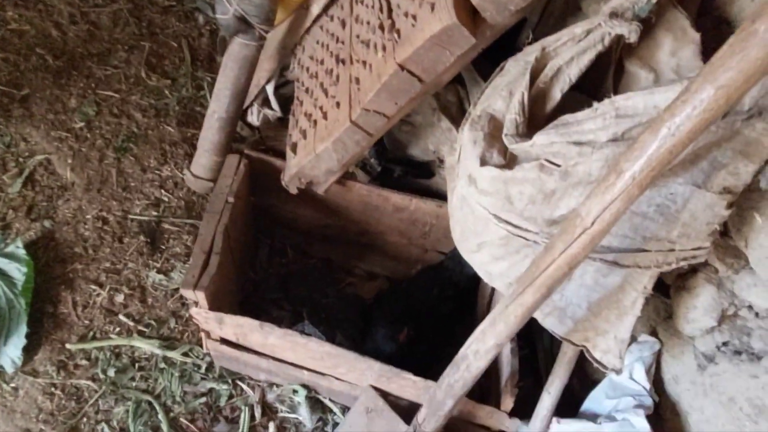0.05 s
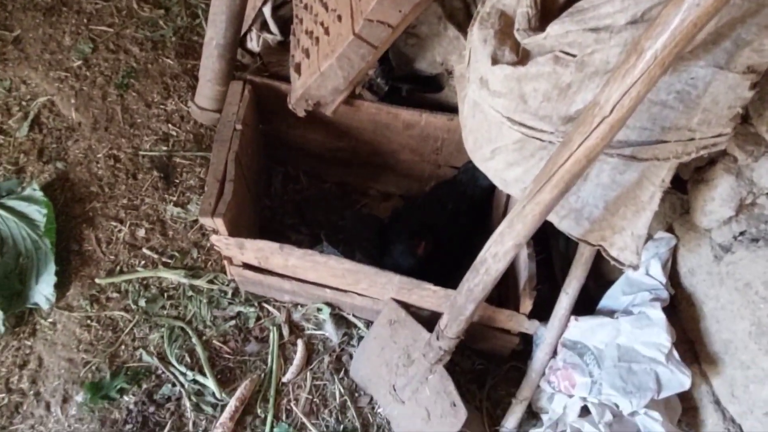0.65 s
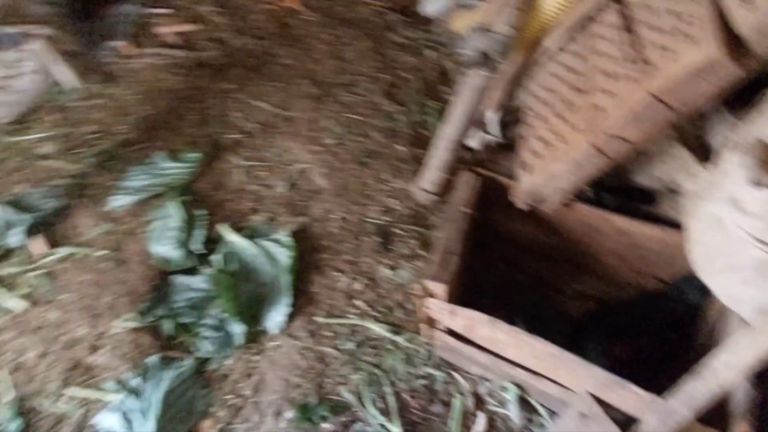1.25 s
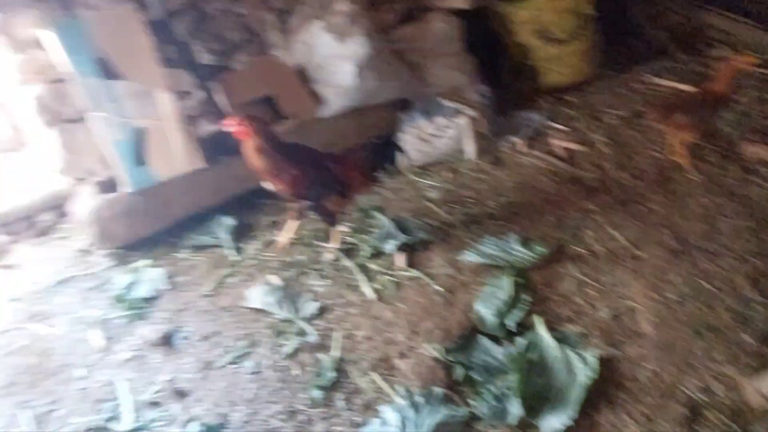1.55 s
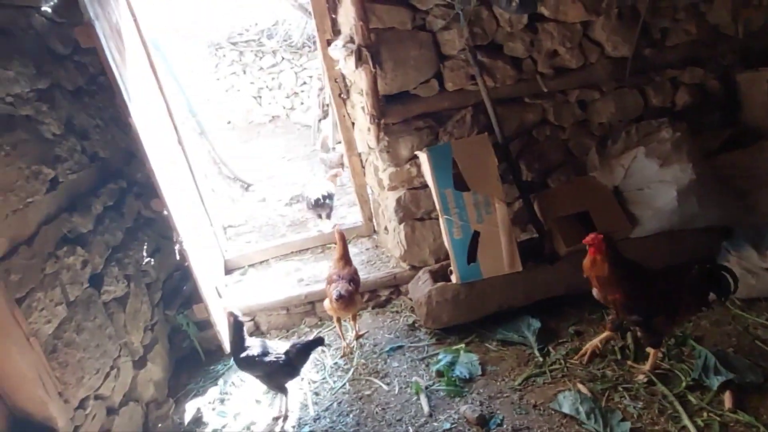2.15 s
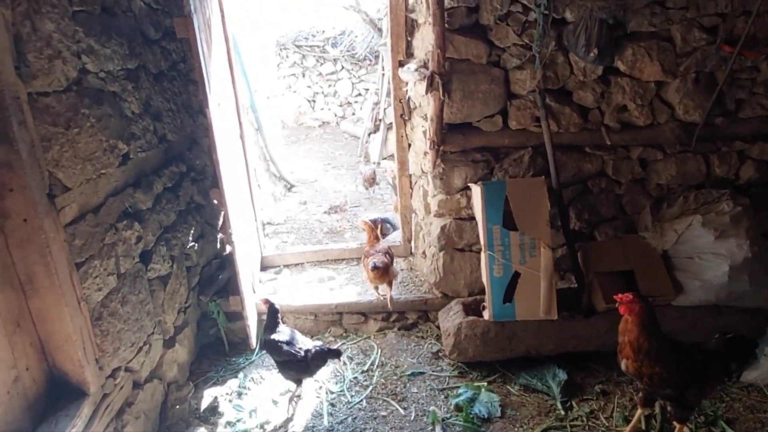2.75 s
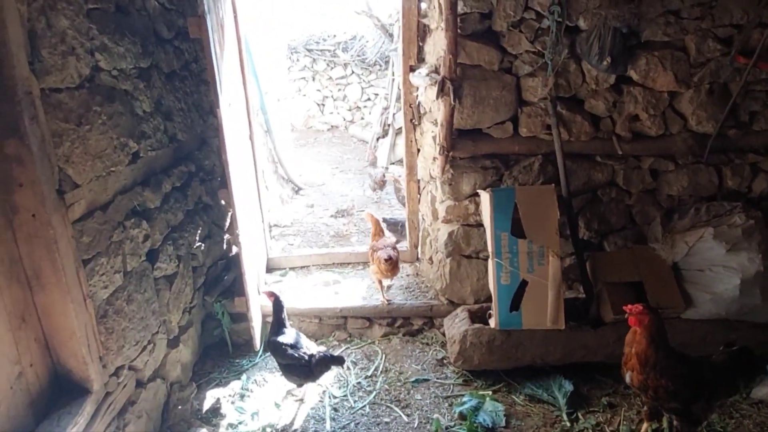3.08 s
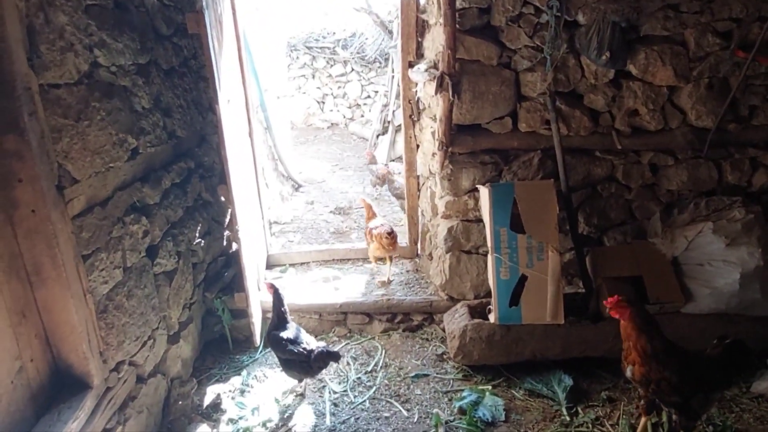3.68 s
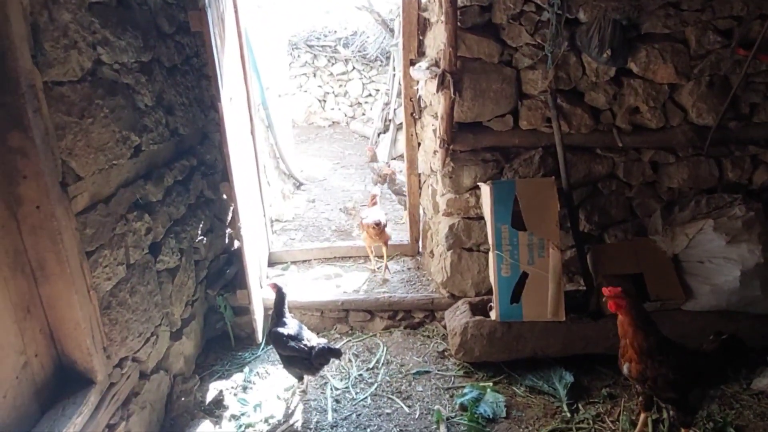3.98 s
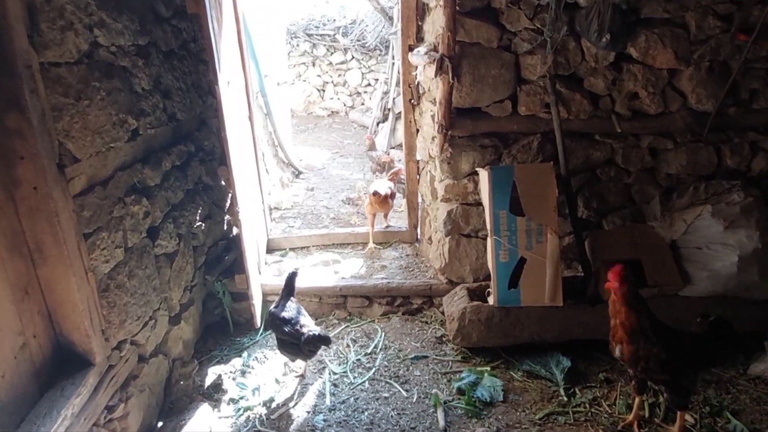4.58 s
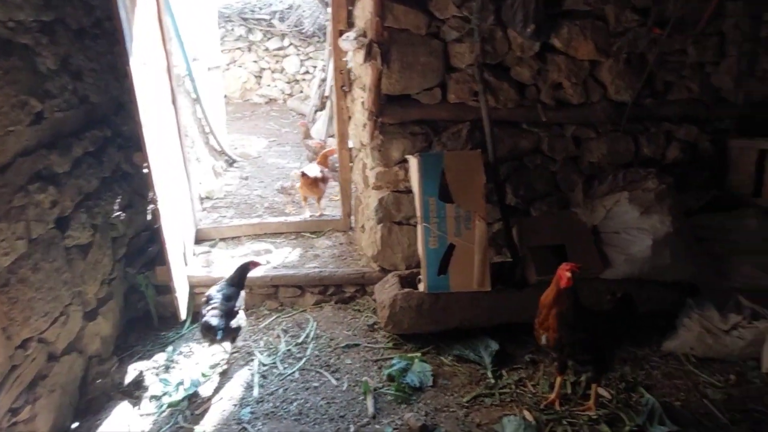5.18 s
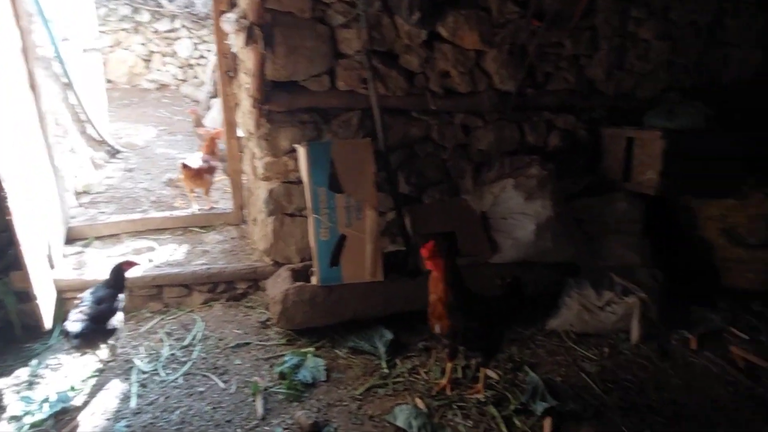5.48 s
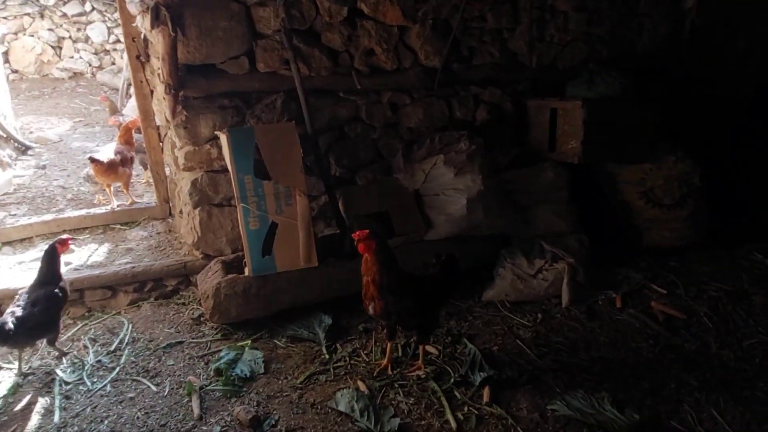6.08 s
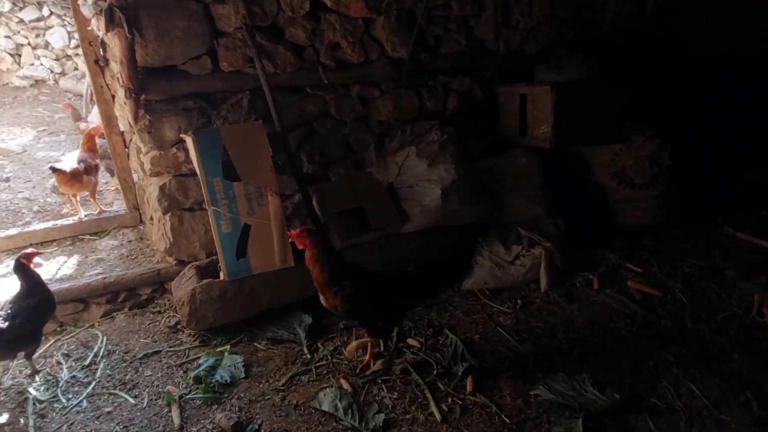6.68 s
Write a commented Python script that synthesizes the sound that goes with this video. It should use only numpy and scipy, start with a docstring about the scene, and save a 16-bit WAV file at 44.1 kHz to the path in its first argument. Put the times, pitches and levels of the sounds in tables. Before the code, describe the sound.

In a small stone coop, a hen clucks about three times a second, growing louder until she lets out a loud, hoarse squawk that opens with a whistle. She clucks again more softly, gives a second rough screech, and trails off. The close walls add a short echo. Straw rustles faintly, and a hand rubs and ticks on the microphone's case.

```python
"""Over faint, still air come a soft coo and a tick, and at once a hen starts clucking in a small stone
coop, about three times a second. Twice she breaks into a loud, hoarse squawk, the first with a whistle.
Her voice is a train of uneven pulses ringing in her throat; the harder she clucks, the higher it rings.
The close walls answer every call. Other hens coo, straw rustles, and later come two faint, breathy swells
of hiss. A hand rubs, ticks and bumps on a camera's case. The camera turns itself down after loud calls."""
import sys
import numpy as np
from scipy import signal
from scipy.fft import rfft, irfft, next_fast_len
from scipy.io import wavfile
from scipy.ndimage import uniform_filter1d, map_coordinates

SR = 44100
rng = np.random.default_rng(int(sys.argv[2]) if len(sys.argv) > 2 else 0)


def master(y):
    """Save y as 16-bit WAV."""
    cut = np.clip(np.atleast_2d(y).T, -1, 1)
    pcm = np.round(cut * 32767)  # scale
    wavfile.write(sys.argv[1], SR, pcm.astype(np.int16))


N = 305613


def amp(db):
    """Turn decibels (dB) into a number to multiply by."""
    return 10 ** (np.asarray(db) / 20)


def unit(x):
    """Scale x to an average strength (rms) of 1."""
    return x / np.sqrt(np.mean(x ** 2) + 1e-20)


def along(points, hz):
    """Read between rows of (Hz, value), spacing the octaves evenly."""
    freqs, values = np.transpose(points)
    return np.interp(np.log(hz + 1), np.log(freqs + 1), values)


def add(track, start_s, x):
    """Mix x into the track from start_s on."""
    start = max(round(start_s * SR), 0)
    x = x[..., :max(N - start, 0)]
    track[..., start:start + x.shape[-1]] += x


def panned(x, db):
    """Make the left louder than the right by db; a negative pan leans right."""
    return x * amp([[db / 2], [-db / 2]])


def wobble(n, rate):
    """A smooth curve through rate random values a second."""
    return map_coordinates(rng.standard_normal(2048), [np.arange(n) * rate / SR], mode="wrap")


def held(t, length, rise_s, fade_db_per_s):
    """A volume that rises, holds until length and then fades."""
    return np.clip(t / rise_s, 0, 1) * amp(-fade_db_per_s * np.maximum(t - length, 0))


def strokes(rows, rise_s, fade_db_per_s):
    """The combined volume of overlapping movements."""
    t = np.arange(N) / SR
    return np.sqrt(sum((amp(db) * held(t - start, length, rise_s, fade_db_per_s)) ** 2
                       for start, length, db in rows))


def filtered(x, response):
    """Scale each frequency in x by response(frequency)."""
    n = x.shape[-1]
    size = next_fast_len(n + 4096)
    return irfft(rfft(x, size) * response(np.fft.rfftfreq(size, 1 / SR)), size)[..., :n]


def resonance(f, hz, width):
    """How something that rings at hz responds to frequency f."""
    return 1j * f * width / (hz * hz - f * f + 1j * f * width)


def ring(x, points, size=2048):
    """Let x ring with the tone colour given by rows of (Hz, dB)."""
    cepstrum = irfft(np.log(amp(along(points, np.fft.rfftfreq(size, 1 / SR)))))
    # this fold puts the ringing after each pulse, never before
    cepstrum[1:size // 2] *= 2
    cepstrum[size // 2 + 1:] = 0
    return signal.fftconvolve(x, irfft(np.exp(rfft(cepstrum))))[:len(x)]


def rush(points, side_db, patchy_db):
    """Stereo noise coloured by rows of (Hz, dB), in shifting patches; side_db sets its width."""
    spectrum = signal.stft(rng.standard_normal((2, N)), nperseg=512)[2]
    patches = uniform_filter1d(rng.standard_normal(spectrum.shape[1:]), size=9, axis=0)
    patches = uniform_filter1d(patches, size=12, axis=1)
    noise = signal.istft(spectrum * amp(patchy_db * unit(patches)), nperseg=512)[1][:, :N]
    mid, side = filtered(noise, lambda f: amp(along(points, f)))
    return unit(np.array([mid + amp(side_db) * side, mid - amp(side_db) * side]))


# Echoes off the floor and walls. Each row: left delay in ms, right delay in ms, level in dB.
WALL_ECHOES = [(1.3, 1.519, -11), (2.9, 3.2, -11), (4.7, 4.85, -4), (6.1, 10, -13.5), (8.2, 8.3, -4.5),
               (10.6, 12, -9), (13.3, 16, -18), (17.4, 13, -9.5)]
# The coop's fading tail. Each row: frequency in Hz, seconds to fade by 60 dB.
TAIL_FADE = [(150, 0.2), (1000, 0.12), (3000, 0.13), (8000, 0.09), (15000, 0.07)]
# The tail's width. Each row: frequency in Hz, how much left and right differ (0 is not at all).
TAIL_WIDTH = [(200, .3), (1000, 1.1)]
def coop(x, walls_db, tail_db, left_lead_s=.00025, wander=0.):
    """A sound arrives on the left first, slaps off the near walls and leaves a short tail."""
    hz, t, noise = signal.stft(rng.standard_normal((2, SR // 3)), SR, nperseg=256)
    mid, side = noise[0], noise[1] * along(TAIL_WIDTH, hz)[:, None]
    fade = amp(-60 * t / along(TAIL_FADE, hz)[:, None])
    tail = signal.istft(np.array([mid + side, mid - side]) * fade, SR, nperseg=256)[1]
    answer = amp(tail_db) * tail / np.linalg.norm(tail[0])
    *delays_ms, slap_db = np.transpose(WALL_ECHOES)
    stretch = 1 + wander * rng.uniform(-1, 1, len(WALL_ECHOES))  # a moving head changes every path
    delays = (np.array(delays_ms) * stretch * SR / 1000).astype(int)
    for channel in range(2):
        answer[channel, delays[channel]] += amp(walls_db + slap_db)
        answer[channel, round(channel * left_lead_s * SR)] += 1
    echoed = signal.fftconvolve(x[None], answer, axes=1)
    return echoed * np.linalg.norm(x) / np.linalg.norm(echoed, axis=1, keepdims=True)  # same energy


# The colour of the background. Each row: frequency in Hz, level in dB.
AIR_COLOUR = [(25, -8), (45, 1), (65, 8.5), (110, -1), (250, -4), (500, -13), (1200, -15), (2500, -18),
              (7000, -20.5), (9000, -22.5), (14000, -23), (16000, -25.5)]
def still_air(level_db=-69.5):
    """The air of the coop: a faint, low rush that wavers slightly."""
    return amp(level_db + .5 * wobble(N, 11)) * rush(AIR_COLOUR, side_db=-1, patchy_db=1.5)


# Soft notes. Each row: middle in seconds, length in seconds, level in dB, first and last pitch in Hz.
COO_NOTES = [(0.023, 0.068, -59.5, 965, 714), (0.193, 0.053, -51.5, 386, 416), (4.978, 0.47, -84, 788, 780)]
def coos(quaver=.025):
    """Other hens sing quiet, sliding notes with one weak overtone."""
    out = np.zeros((2, N))
    for middle, length, db, first_hz, last_hz in COO_NOTES:
        n = int(length * SR)
        pitch = np.linspace(first_hz, last_hz, n) * (1 + quaver * wobble(n, 318))
        phase = 2 * np.pi * np.cumsum(pitch) / SR
        note = unit(np.hanning(n) * (np.sin(phase) + amp(-14.5) * np.sin(2 * phase)))
        add(out, middle - length / 2, coop(amp(db) * note, walls_db=-23, tail_db=-8))
    return out


# Small ticks. Each row: start in seconds, peak level in dB, ring in Hz, pan in dB.
CASE_TICKS = [(0.04, -41.5, 8000, -4.5), (0.9111, -26, 8600, -14), (2.4326, -31, 4960, 0),
              (2.4574, -42.5, 5020, -5), (2.8489, -17, 11980, -8.5), (4.1579, -47.5, 3200, -8),
              (5.1971, -41.5, 8950, -20.5)]
def ticks():
    """The case ticks: a sharp snap of noise with a short, weaker tail."""
    out, t = np.zeros((2, N)), np.arange(SR // 8) / SR
    fade = amp(-60 * t / .0017) + amp(-12.5 - 60 * t / .05)
    for start, db, hz, pan in CASE_TICKS:
        snap = rng.standard_normal((2, len(t))) * fade
        tick = filtered(snap, lambda f: resonance(f, hz, width=1.2 * hz))
        add(out, start, panned(amp(db) * tick / np.abs(tick).max(), pan))
    return out


def voice_box(pitch, jitter, scatter_db, rasp):
    """One pulse per cycle, uneven in time (jitter) and size (scatter), each with a puff of air (rasp)."""
    n = len(pitch)
    cycles = np.cumsum(pitch) / SR + .5
    late, size = rng.standard_normal((2, 256))
    at = np.searchsorted(cycles, np.arange(1, int(cycles[-1]) + 1)).clip(0, n - 1)
    at = (at + late[:len(at)] * (jitter * SR / pitch)[at]).astype(int).clip(0, n - 1)
    pulses = np.bincount(at, amp(scatter_db * size[:len(at)]), n)
    puff_volume = signal.lfilter([1], [1, -np.exp(-1 / (.0014 * SR))], pulses)
    puffs = puff_volume * rng.standard_normal(SR)[:n]
    share = np.clip(rasp, 0, 1)
    return np.sqrt(1 - share) * unit(pulses) + np.sqrt(share) * unit(puffs)


# The clucks. Each row: start in seconds, level in dB, length in seconds, then the chest and the
# bright edge in dB compared with the main ring.
HEN_CLUCKS = [(0.11, -42, .06, -16, -14), (0.218, -49, .04, 14.5, -14.5),
              (0.373, -37.5, .063, -16.5, -10.5), (0.67, -34.5, .058, -18, -10),
              (1.01, -33.5, 0.053, -17, -16.5), (1.271, -32, .055, -12, -12.5),
              (1.656, -28.5, .06, -16, -11), (1.957, -28.5, .06, -16, -15),
              (2.213, -29.5, 0.058, -12.5, -15), (2.543, -28.5, .058, -17, -15.5),
              (2.836, -24.5, .061, -21.5, -13), (3.153, -25.5, .065, -17, -15.5),
              (3.424, -22.5, .066, -17.5, -15.5), (4.421, -38, .058, -12, -14.5),
              (4.706, -43.5, .047, -16, -16), (5.056, -48.5, .052, -9, -14), (5.343, -35, .06, -9.5, -13.5),
              (5.632, -30.5, .075, -9.5, -6.5), (5.886, -30, 0.063, -14, -9),
              (6.421, -37.5, .072, 5.5, -10.5), (6.617, -43, 0.046, 1.5, -13),
              (6.785, -49, .045, 3.5, -11.5)]
# The throat's main ring. Each row: multiple of the throat frequency, level in dB.
MAIN_RING = [(.15, -52), (.45, -17.5), (.68, -15.5), (.87, -6.5), (1, 0.5), (1.15, -7), (1.36, -10),
             (1.6, -31), (1.95, -25.5), (4, -47), (16, -75)]
# The chest's low ring. Each row: frequency in Hz, level in dB.
CHEST_RING = [(100, -38), (170, -29.5), (230, -1), (310, 6), (420, -5), (560, 2), (800, -13), (2000, -50.5)]
# The bright edge of an easy cluck. Each row: frequency in Hz, level in dB.
EDGE_RING = [(150, -50), (1200, -24.5), (1650, -11), (2150, 4.5), (2600, -1.5), (3100, 1.5), (3400, 1.5),
             (3850, -3.5), (4700, -10.5), (5600, -24.5), (7100, -17.5), (8800, -31), (12500, -23.5),
             (16000, -24.5)]
def clucks(easy_db=-30, easy_pitch_hz=188.5, easy_throat_hz=893, fizz_hz=4500):
    """Each cluck swells until the throat shuts it off. More effort: slower pulses, a higher ring."""
    out, t = np.zeros((2, N)), np.arange(SR // 10) / SR
    for start, db, length, chest_db, edge_db in HEN_CLUCKS:
        effort_db = db - easy_db
        pitch = easy_pitch_hz - 1.49 * effort_db
        throat_hz = easy_throat_hz + 8 * effort_db
        progress = np.clip(t / length, 0, 1)
        push = progress ** 2.3 * (1 - progress) ** 1.55
        push /= push.max()
        pulses = push * voice_box(pitch * (.85 + .15 * push), jitter=.035, scatter_db=1.5, rasp=.08)
        body = ring(pulses, [(throat_hz * multiple, level) for multiple, level in MAIN_RING])
        chest = ring(pulses, CHEST_RING)
        shift, *tints = rng.standard_normal(len(EDGE_RING) + 1)  # each cluck has its own vowel
        stretch = np.sqrt(throat_hz / easy_throat_hz) * (1 + .03 * shift)
        vowel = [(hz * stretch, level + 3 * tint - .07 * effort_db * (hz > fizz_hz))
                 for (hz, level), tint in zip(EDGE_RING, tints)]
        # the edge needs pressure, and dies as the beak closes
        edge = ring(pulses * push ** .4 * amp(-7 * progress), vowel)
        voice = unit(unit(body) + amp(chest_db) * unit(chest) + amp(edge_db) * unit(edge))
        echoed = coop(amp(db) * voice, walls_db=5, tail_db=3, left_lead_s=.00019, wander=.08)
        add(out, start, panned(echoed, db=-1.5))
    return out


# Hand strokes. Each row: start in seconds, length in seconds, level in dB, extra dB for the hiss.
HAND_RUBS = [(0.634, .46, -67, 9.5), (1.409, 0.4, -64.5, -2), (1.98, .19, -50, -4.5),
             (2.298, 0.36, -65, 1.5), (2.51, 0.43, -52.5, -1.5), (2.663, 0.19, -61, 7.5),
             (2.956, 0.24, -55.5, -9), (3.2, 0.28, -64, -6), (5.118, 0.3, -64.5, -1.5)]
# The rumble of the case and the hiss of skin. Each row: frequency in Hz, level in dB.
CASE_COLOUR = [(60, -19), (120, -7.5), (250, -9.5), (480, -11.5), (900, -16.5), (1900, -13), (3800, -13),
               (6000, -21), (9000, -29.5), (16000, -40)]
SKIN_COLOUR = [(2000, -32.5), (6000, -11.5), (9000, -14), (12500, 0.5), (16000, 0)]
def rubbing(rise_s=.08, fade_db_per_s=109):
    """Skin slides unevenly on the case, hissing beside the right microphone; the rumble reaches both."""
    grip = amp(1.5 * wobble(N, 25) + 1.8 * wobble(N, 200))
    rumble_rows = [(start, length, db) for start, length, db, _ in HAND_RUBS]
    hiss_rows = [(start, length, db + extra) for start, length, db, extra in HAND_RUBS]
    rumble = strokes(rumble_rows, rise_s, fade_db_per_s) * rush(CASE_COLOUR, side_db=-1.5, patchy_db=2)
    hiss = strokes(hiss_rows, rise_s, fade_db_per_s) * rush(SKIN_COLOUR, side_db=-5.5, patchy_db=1.5)
    return grip * (panned(rumble, db=-3.5) + panned(hiss, db=-8))


# Four rustles of straw, then two faint, breathy swells of hiss.
# Each row: start in seconds, length in seconds, level in dB.
RUSTLE_SWELLS = [(0.66, .1, -61.5), (0.85, .17, -59), (1.5, .15, -55.5), (1.72, .2, -65.5),
                 (4.2, .27, -64.5), (5.28, .3, -69)]
# Their colour. Each row: frequency in Hz, level in dB.
RUSTLE_COLOUR = [(200, -18.5), (900, -2), (1700, 5.5), (2700, 6), (4500, -6.5), (7000, -9), (15000, -11.5)]
def rustles(snaps_per_s=260, spread_db=5, swish=.48):
    """Many tiny snaps of uneven size over a soft swish, swelling and fading."""
    sizes = amp(spread_db * np.minimum(rng.exponential(size=N), 3))
    snaps = unit(sizes * (rng.random(N) < snaps_per_s / SR))
    rustle = unit(ring(snaps + swish * rng.standard_normal(N), RUSTLE_COLOUR))
    volume = strokes(RUSTLE_SWELLS, rise_s=.08, fade_db_per_s=91.5)
    return coop(volume * rustle, walls_db=1.5, tail_db=0)[:, :N]


# Dull bumps. Each row: middle in seconds, level in dB.
HAND_BUMPS = [(0.952, -60), (3.619, -49.5)]
def bumps():
    """The hand bumps the case: a short swell of very low noise."""
    out, t = np.zeros((2, N)), np.arange(SR // 8) / SR
    for middle, db in HAND_BUMPS:
        thud = filtered(rng.standard_normal(len(t)), lambda f: resonance(f, hz=60, width=52) ** 2)
        add(out, middle - t.mean(), amp(db) * unit(thud * np.hanning(len(t))))
    return out


def beak_ring(x, hz, width_hz=210):
    """The beak rings in one narrow band that slides along the curve hz."""
    turn = np.exp(2j * np.pi * np.cumsum(hz) / SR)
    lowpass = signal.butter(2, width_hz / 2, fs=SR, output="sos")
    return unit((signal.sosfilt(lowpass, x / turn) * turn).real)  # shift down, filter, shift back


# A cry, then a screech. Each row: start in seconds, length in seconds, level in dB, pitch in Hz,
# roughness from 0 to 1, beak compared with throat in dB, pan in dB.
HEN_SQUAWKS = [(3.536, 0.26, -7, 326.8, 0.36, -15.5, -1.5), (6.0, 0.24, -13, 337.2, .35, -4.5, 0.2)]
# The throat's colour in each call. Each row: frequency in Hz, level in dB.
CRY_COLOUR = [(120, -46.5), (380, -35), (720, -16), (850, -11.5), (930, -1.5), (1000, 6.5), (1090, 0),
              (1200, -5.5), (1420, -9.5), (1700, -22), (2100, -15), (2650, -23.5), (3300, -30), (4500, -25),
              (7200, -36), (8500, -45), (15000, -37.5)]
SCREECH_COLOUR = [(120, -53), (400, -22), (720, -8.5), (1020, 0), (1200, -7.5), (1430, -2.5), (1850, -8.5),
                  (2330, -4), (2620, -12.5), (2950, -27.5), (3550, -13), (4400, -16.5), (6800, -27.5),
                  (8800, -34), (15000, -32)]
# The beak's sliding ring in each call. Each row: time in seconds, frequency in Hz.
CRY_SLIDE = [(3.57, 3600), (3.63, 3370), (3.71, 3210), (3.75, 2960), (3.81, 3050)]
SCREECH_SLIDE = [(6.029, 2460), (6.137, 2080), (6.22, 2370), (6.269, 2200)]
def squawks(climb_hz_per_s=130, slump_hz_per_s=1200, burst_s=.05):
    """Long, forced calls of scattered, hissing pulses. The pitch climbs under pressure, then slumps."""
    out = np.zeros((2, N))
    shapes = [(CRY_COLOUR, CRY_SLIDE), (SCREECH_COLOUR, SCREECH_SLIDE)]
    for (start, length, db, hz, roughness, beak_db, pan), (colour, slide) in zip(HEN_SQUAWKS, shapes):
        t = np.arange(int((length + .05) * SR)) / SR
        burst = np.exp(-t / burst_s)  # starts louder and rougher, then settles
        rough = roughness + .5 * burst
        pitch = hz + climb_hz_per_s * t - slump_hz_per_s * np.maximum(t - length, 0)
        pitch *= 1 + .011 * wobble(len(t), 70)
        pulses = voice_box(pitch, jitter=.1 * rough, scatter_db=2, rasp=.88 * rough)
        beak = beak_ring(pulses, np.interp(start + t, *np.transpose(slide)))
        voice = unit(unit(ring(pulses, colour)) + amp(beak_db) * beak)
        volume = held(t, length, rise_s=.014, fade_db_per_s=700)
        volume *= amp(db + 3 * burst - 13.5 * whistle_lock(start + t))  # gives way to the whistle
        echoed = coop(volume * voice, walls_db=-1, tail_db=4.5, left_lead_s=.00017)
        add(out, start, panned(echoed, pan))
    return out


WHISTLE_START_S, WHISTLE_LENGTH_S, UNLOCK_DB_PER_S = 3.54, .079, 1804
def whistle_lock(time_s):
    """How firmly the voice box is locked into the whistle, from 0 to 1."""
    return held(time_s - WHISTLE_START_S, WHISTLE_LENGTH_S, WHISTLE_LENGTH_S, UNLOCK_DB_PER_S)


# The tones in the whistle. Each row: multiple of the pitch, level in dB.
WHISTLE_TONES = [(1, -10.5), (2, -16), (3, -35), (4, -25), (5, -36.5), (7, -37)]
def whistle(start_hz=917, sag_hz_per_s=1200, level_db=-6.5, grow_db=10):
    """Early in the cry, the voice box locks for a moment into one clean, falling tone."""
    out, t = np.zeros((2, N)), np.arange(SR // 8) / SR
    pitch = (start_hz - sag_hz_per_s * t) * (1 + .0053 * wobble(len(t), 200))
    phase = 2 * np.pi * np.cumsum(pitch) / SR
    tone = unit(sum(amp(db) * np.sin(round(multiple) * phase) for multiple, db in WHISTLE_TONES))
    volume = held(t, WHISTLE_LENGTH_S, rise_s=.014, fade_db_per_s=UNLOCK_DB_PER_S)
    volume *= amp(level_db + grow_db * (whistle_lock(WHISTLE_START_S + t) - 1))
    add(out, WHISTLE_START_S, panned(coop(volume * tone, walls_db=-18.5, tail_db=-22.5), db=-2.5))
    return out


def auto_volume(x, threshold_db=-23.5, take_back=.4, sense_s=.033, recover_db_per_s=13):
    """The camera takes back a share of every dB above the threshold, then slowly recovers."""
    keep = np.exp(-1 / (sense_s * SR))
    power = signal.lfilter([1 - keep], [1, -keep], np.mean(x ** 2, axis=0))
    wanted_cut_db = take_back * np.maximum(10 * np.log10(power + 1e-20) - threshold_db, 0)
    recovery_db = recover_db_per_s * np.arange(N) / SR
    cut_db = np.maximum.accumulate(wanted_cut_db + recovery_db) - recovery_db
    return x * amp(-cut_db)


def scene():
    """Hens, rustles, the hand on the case and the still air, added together."""
    hens = clucks() + squawks() + whistle() + coos()
    return hens + rustles() + rubbing() + ticks() + bumps() + still_air()


# The colour of the two microphone openings. Each row: frequency in Hz, left minus right in dB.
MIC_BALANCE = [(600, 2), (1100, 0.5), (2200, -8.5), (4500, -0.5), (13000, -2.5)]
def record(dry, top_hz=16100):
    """The camera colours left and right differently, turns loud calls down and cuts the top treble."""
    heard = filtered(dry, lambda f: amp(np.outer([.5, -.5], along(MIC_BALANCE, f))))
    return filtered(auto_volume(heard), lambda f: f < top_hz)


dry = scene()
out = record(dry)
master(out)
```